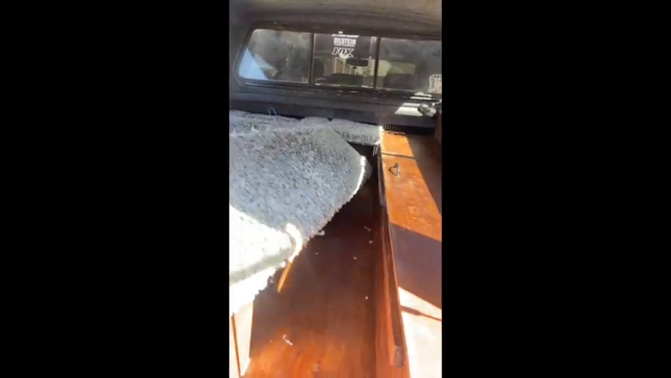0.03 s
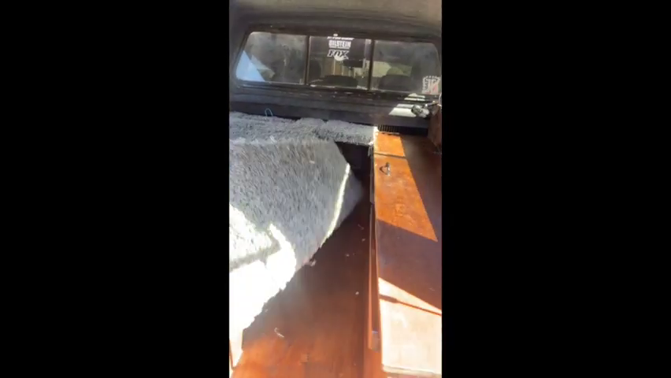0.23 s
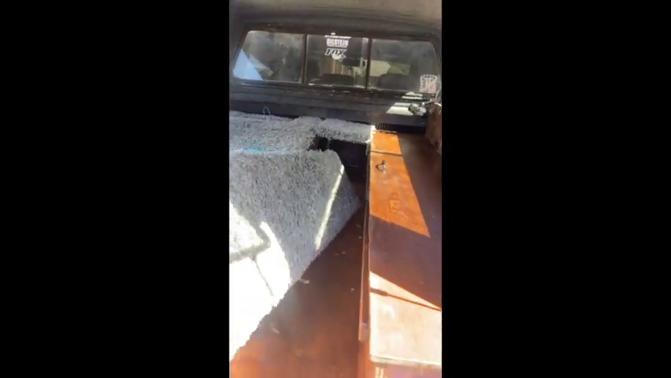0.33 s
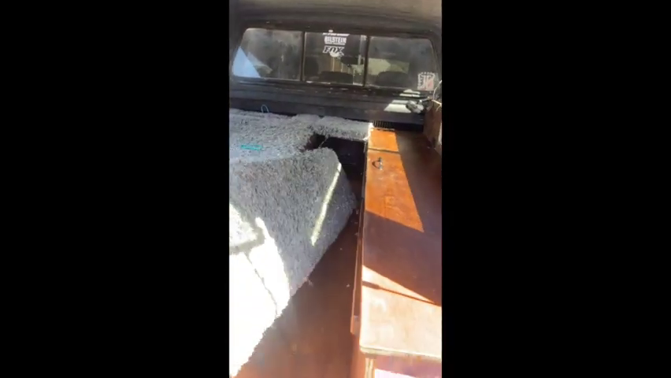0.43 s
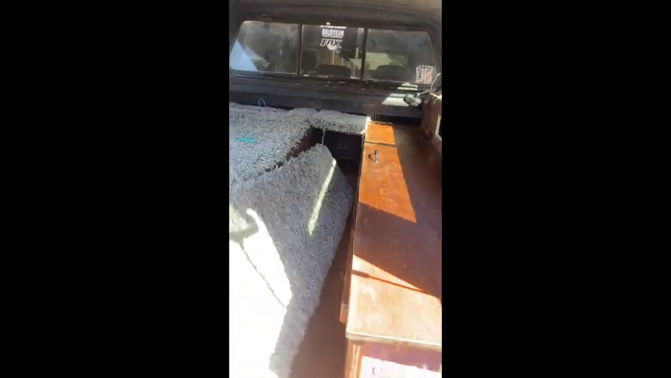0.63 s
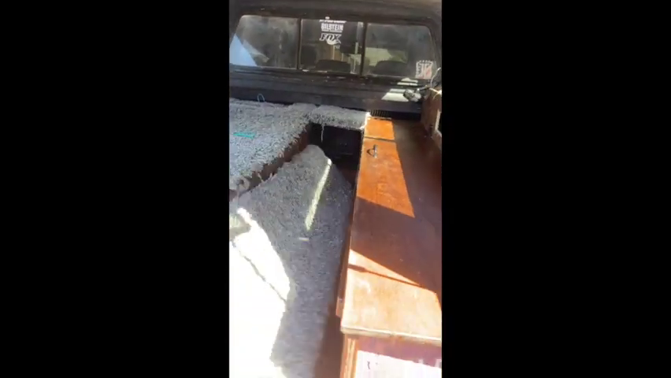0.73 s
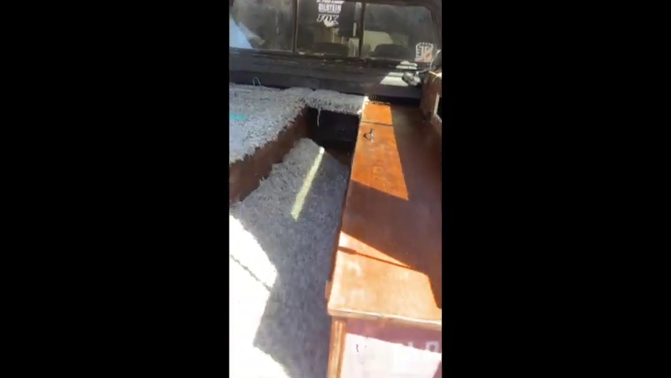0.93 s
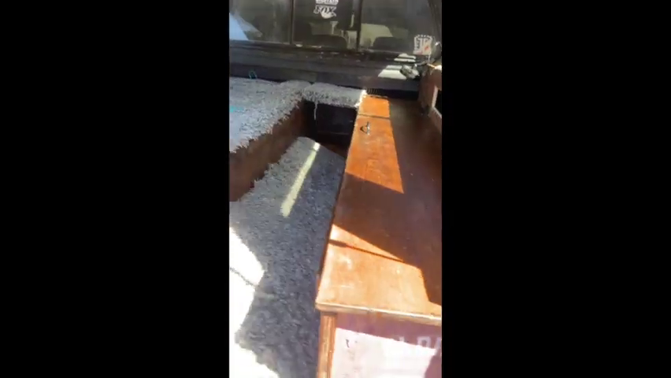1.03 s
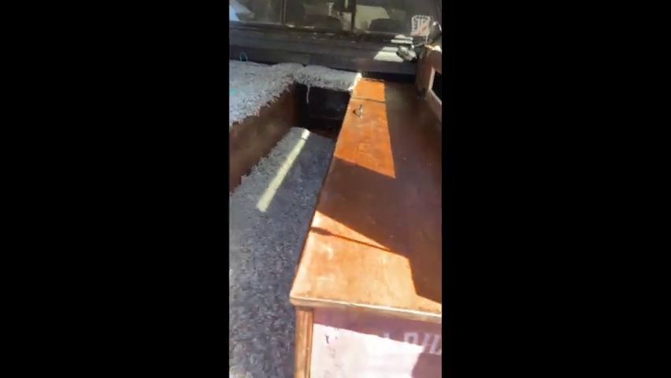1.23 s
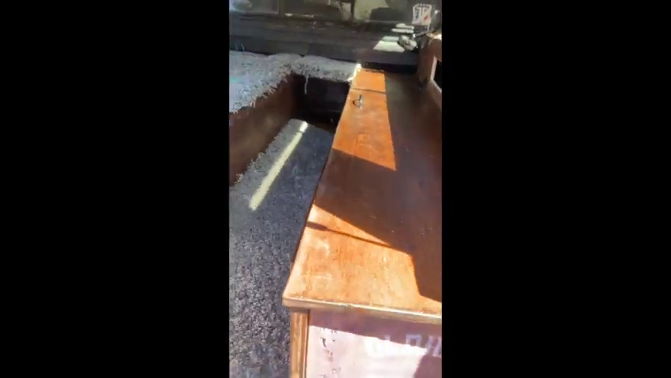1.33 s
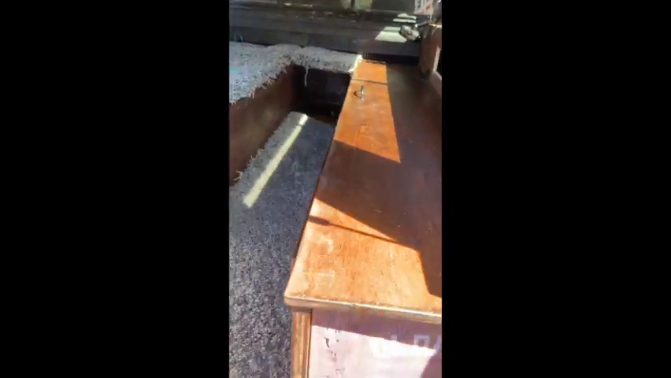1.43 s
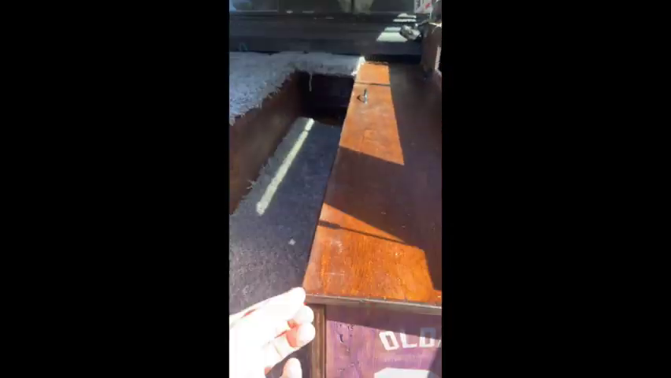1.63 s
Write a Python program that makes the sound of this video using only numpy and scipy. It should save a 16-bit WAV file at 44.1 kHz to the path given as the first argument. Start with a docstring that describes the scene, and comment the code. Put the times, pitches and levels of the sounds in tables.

```python
"""A carpeted wooden panel is lowered into its frame in a small camper: it bangs, scuffs, slides and thumps home.
Blows are cracks, clacks and thuds of noise over ringing panel modes, with the cramped cabin booming around them;
scrapes are tiny random slips through wood resonances; the wobble and carpet brushing are shaped noise.
A loose fitting pings across the cabin, and at the end something ticks right at the two-port microphone."""
import sys
import numpy as np
from scipy import signal
from scipy.fft import rfft, irfft, next_fast_len
from scipy.io import wavfile
from scipy.ndimage import uniform_filter1d, minimum_filter1d, map_coordinates

SR = 44100
rng = np.random.default_rng(int(sys.argv[2]) if len(sys.argv) > 2 else 0)


def generate_wav(signal):
    """Clip the signal to [-1, 1] and save it as 16-bit WAV at the path in sys.argv[1]."""
    frames = np.transpose(np.atleast_2d(signal))
    scaled = np.clip(frames, -1, 1) * 32767
    pcm = np.round(scaled).astype(np.int16)
    wavfile.write(sys.argv[1], SR, pcm)


N = 74970


def amp(db):
    """Decibels to gain."""
    return 10 ** (np.asarray(db) / 20)


def unit(x):
    """Scale to rms 1."""
    return x / np.sqrt(np.mean(x ** 2) + 1e-20)


def seconds():
    """The time of each sample."""
    return np.arange(N) / SR


def filtered(x, response):
    """x times a complex response of frequency, padded so that the end does not wrap round."""
    m = next_fast_len(N + SR // 2)
    return irfft(rfft(x, m) * response(np.fft.rfftfreq(m, 1 / SR)), m)[..., :N]


def coloured(x, points):
    """x through (frequency [Hz], level [dB]) points on a log frequency axis."""
    f, db = np.transpose(points)
    return filtered(x, lambda hz: amp(np.interp(np.log(hz + 1), np.log(f + 1), db)))


def noise(points):
    """Coloured noise of rms 1."""
    return unit(coloured(rng.standard_normal(N), points))


def gains(rows):
    """A gain per sample for each dB column."""
    times, *columns = np.transpose(rows)
    return [amp(np.interp(seconds(), times, db)) for db in columns]


def steady(x, span_s):
    """Even out the chance swells of x, leaving rms near 1."""
    power = uniform_filter1d(x * x, max(3, int(span_s * SR)))
    return x / np.sqrt(np.abs(power) + 1e-9)


def add(track, s, sound):
    """Mix a sound in at time s."""
    i = int(s * SR)
    track[i:i + len(sound)] += sound[:N - i]


def ring(modes, rise_s):
    """Damped sines of alternating sign that swell over rise_s, each level varying a little at random."""
    t = seconds()[:SR]
    total = np.zeros(len(t))
    for k, (hz, t60, db) in enumerate(modes):
        decay = amp(db + rng.normal(0, .7) - 60 * t / t60)
        total += (-1) ** k * decay * np.sin(2 * np.pi * hz * t)
    return total * (1 - np.exp(-t / rise_s))


def burst(tone, decay):
    """Crowded wood modes heard as noise: a quick direct part, then the cabin's short tail."""
    rise_s, direct_s, tail_db, tail_s = decay
    t = seconds()[:SR]
    direct = amp(-60 * t / direct_s)
    tail = amp(tail_db - 60 * t / tail_s)
    envelope = np.hypot(direct, tail) * (1 - np.exp(-t / rise_s))
    return steady(noise(tone), .008)[:len(t)] * envelope


# spectrum of the cabin's faint rumble: (frequency [Hz], relative level [dB])
RUMBLE_TONE = [(30, -1), (120, 0.5), (400, -12), (1500, -26), (10000, -43), (14000, -75)]
RUMBLE_DB = -56


def cabin_rumble():
    """The faint, mostly low rumble of the cabin is steady noise."""
    return amp(RUMBLE_DB) * noise(RUMBLE_TONE)


# carpet brushing: (time [s], level [dB])
BRUSH = [(0, -47), (.13, -47), (.22, -51), (.45, -53.5), (.55, -62.5), (.75, -61.5), (.9, -47.5),
         (1.2, -48), (1.33, -63), (1.4, -57), (1.44, -77), (1.7, -66)]
# its spectrum: (frequency [Hz], relative level [dB])
BRUSH_TONE = [(400, -1), (900, -6), (1800, -9.5), (3000, -17), (7000, -23), (11200, -16), (12200, -37),
              (16000, -75)]


def carpet_brush():
    """Carpet brushing is soft noise that swells and fades."""
    return gains(BRUSH)[0] * noise(BRUSH_TONE)


# small close ticks: (time [s], level before doubling [dB])
TICKS = [(1.6387, -32), (1.6432, -26), (1.6474, -28), (1.651, -32), (1.6693, -38), (1.6745, -30)]
# their spectrum: (frequency [Hz], relative level [dB])
TICK_TONE = [(2000, -26), (6000, -17), (8000, -4), (10700, 3), (13500, -21), (16000, -33)]
# rustle under the ticks: (time [s], level [dB])
RUSTLE = [(1.62, -85), (1.636, -47), (1.655, -46), (1.675, -41), (1.7, -50)]
# its spectrum: (frequency [Hz], relative level [dB])
RUSTLE_TONE = [(100, 0), (300, 6), (900, -15), (3000, -24), (11000, -15), (13000, -33), (16000, -55)]
TICK_T60_S = .003


def ticks():
    """A quick run of bright, rapidly decaying ticks over a soft rustle, right at the microphone."""
    out, t = np.zeros(N), seconds()[:SR // 50]
    for s, db in TICKS:
        envelope = 2 * amp(db - 60 * t / TICK_T60_S)
        add(out, s, envelope * steady(noise(TICK_TONE), .001)[:len(t)])
    return out + gains(RUSTLE)[0] * noise(RUSTLE_TONE)


# crack spectrum: (frequency [Hz], relative level [dB])
CRACK = [(400, -18), (1000, 5), (3800, -1), (8000, -9), (10600, -9), (12800, -32), (16000, -72)]
# crack decay: (rise [s], direct t60 [s], tail level [dB], tail t60 [s])
CRACK_DECAY = (.0002, .025, -17, .135)


def crack():
    """The sharp bright edge of a contact."""
    return burst(CRACK, CRACK_DECAY)


# modes of the loose metal fitting: (frequency [Hz], t60 [s], level [dB])
FITTING = [(1561, .09, -39), (1960, .08, -46), (4156, .06, -49)]
FITTING_S, FITTING_CLICK_DB = .426, -46
MODE_RISE_S = .002  # for the fitting and the panel


def fitting():
    """A loose metal fitting pings once, its modes set off with a click, as the panel wobbles."""
    out = np.zeros(N)
    add(out, FITTING_S, ring(FITTING, MODE_RISE_S) + amp(FITTING_CLICK_DB) * crack())
    return out


# the panel flexing: (time [s], level [dB])
WOBBLE = [(0, -49), (.22, -52), (.28, -28), (.56, -30), (.66, -39), (1.13, -37), (1.22, -46), (1.46, -40),
          (1.7, -48)]
# its spectrum: (frequency [Hz], relative level [dB])
WOBBLE_TONE = [(20, -28), (38, -8), (48, -2), (100, 0), (170, -5), (300, -24), (3000, -110)]
JUDDER_S, JUDDER_LENGTH_S, JUDDER_HZ, JUDDER_DB = 1.053, .03, 134, -16


def wobble():
    """The moving panel flexes as low noise, with a brief sine shudder where it binds."""
    t = seconds() - JUDDER_S
    swell = np.exp(-(t / JUDDER_LENGTH_S) ** 2)
    judder = amp(JUDDER_DB) * swell * np.sin(2 * np.pi * JUDDER_HZ * t)
    return gains(WOBBLE)[0] * steady(noise(WOBBLE_TONE), .05) + judder


# rasp spectrum: (frequency [Hz], relative level [dB])
RASP = [(200, -6), (900, 2.5), (1600, -2.5), (2700, 0), (4200, -11), (6800, -17), (11000, -19),
        (12300, -45), (16000, -85)]
SLIPS_PER_S, SLIP_SPREAD_DB = 13000, 3
GRIP_PER_S, GRIP_DB = 70, 2  # the grip comes and goes in random surges


def scrape(stroke, body):
    """Tiny slips rasp directly and make the wood groan at its resonances."""
    slips = (rng.random(N) < SLIPS_PER_S / SR) * rng.standard_normal(N)
    slips = slips * amp(SLIP_SPREAD_DB * rng.standard_normal(N))

    def wood(f):
        return sum((-1) ** k * amp(db) * 1j * f * width / (centre ** 2 - f * f + 1j * f * width)
                   for k, (centre, width, db) in enumerate(body))

    groan_gain, rasp_gain = gains(stroke)
    dull = coloured(filtered(slips, wood), [(600, -2), (9000, -50)])
    surges = map_coordinates(rng.standard_normal(N), [seconds() * GRIP_PER_S], mode="mirror")
    groan = groan_gain * steady(dull, .03)
    rasp = rasp_gain * steady(coloured(slips, RASP), .025)
    return amp(GRIP_DB * surges) * (groan + rasp)


# brief scuff on the frame: (time [s], groan level [dB], rasp level [dB])
SCUFF = [(.57, -80, -75), (.578, -32, -35), (.594, -22, -37), (.606, -18, -29), (.624, -16, -34),
         (.648, -24, -54), (.662, -34, -58), (.76, -70, -90)]
# wood resonances of the scuff: (frequency [Hz], width [Hz], level [dB])
SCUFF_BODY = [(325, 55, 2.5), (405, 35, -9), (570, 50, -19), (690, 110, -15)]


def scuff():
    """An edge scuffs the frame: a brief scrape."""
    return scrape(SCUFF, SCUFF_BODY)


# long slide into place: (time [s], groan level [dB], rasp level [dB])
SLIDE = [(.6, -90, -100), (.78, -35, -53), (.858, -36, -54), (.9, -25.5, -40), (.95, -26, -42),
         (1.01, -26, -36), (1.11, -23, -36), (1.145, -33, -54), (1.19, -43, -64), (1.28, -33, -53),
         (1.37, -41, -58), (1.45, -75, -100)]
# wood resonances of the slide: (frequency [Hz], width [Hz], level [dB])
SLIDE_BODY = [(140, 35, -1), (275, 40, -6), (354, 30, -1), (390, 30, -7), (470, 45, -13), (610, 80, -15),
              (835, 25, -12)]


def slide():
    """The panel slides along the wood: a long scrape."""
    return scrape(SLIDE, SLIDE_BODY)


# cabin air modes: (frequency [Hz], t60 [s], level [dB])
CABIN = [(52, .85, -9), (64, .45, -3.5), (90, .45, -3)]


def cabin_boom():
    """The air of the cramped cabin rings in a few low modes that swell slowly."""
    return ring(CABIN, .01)


# clack spectrum: (frequency [Hz], relative level [dB])
CLACK = [(100, -14), (400, -4), (600, 0), (900, -8), (1500, 0), (2100, -11), (3100, -11), (4800, -28),
         (12000, -62)]
# clack decay: (rise [s], direct t60 [s], tail level [dB], tail t60 [s])
CLACK_DECAY = (.0005, .028, -14, .155)


def clack(bright_hz):
    """The woody knock of a contact, duller when the contact is softer."""
    contact = signal.butter(2, min(bright_hz, SR / 4), fs=SR, output="sos")
    return signal.sosfilt(contact, burst(CLACK, CLACK_DECAY))


# names of the places struck, in the order of the level columns below
PLACES = ("edge", "face", "foot")
# panel modes: (frequency [Hz], t60 [s], level struck at the edge [dB], on the face [dB], at the foot [dB])
PANEL = [(108, .38, -7, -20, -18), (133, .3, -15, -26, -17), (169, .17, -3.5, -16, -24),
         (239, .22, -13, -13, -32), (321, .15, -12, -24, -17), (352, .15, -19, -12, -28),
         (366, .14, -4, -27, -20), (397, .15, -12, -23.5, -20), (456, .13, -13, -28, -26),
         (516, .15, -14, -12, -35), (580, .06, -16, -6, -28), (690, .08, -18, -23.5, -19),
         (1480, .036, -34, -9, -19)]
# thud spectrum: (frequency [Hz], relative level [dB])
THUD = [(70, -11), (130, -2), (200, 0), (450, -11), (800, -29), (4000, -100)]
# thud decay: (rise [s], direct t60 [s], tail level [dB], tail t60 [s])
THUD_DECAY = (.003, .1, -9, .26)
# thud under the ring: (level struck at the edge [dB], on the face [dB], at the foot [dB])
THUD_DB = (-8, -12, -12)


def panel_body(place, bright_hz):
    """The place struck sets how strongly each panel mode rings; a soft contact excites the high ones less."""
    where = PLACES.index(place)
    modes = []
    for hz, t60, *levels in PANEL:
        softness_db = 10 * np.log10(1 + (hz / bright_hz) ** 4)
        modes.append((hz, t60, levels[where] - softness_db))
    return ring(modes, MODE_RISE_S) + amp(THUD_DB[where]) * burst(THUD, THUD_DECAY)


# blows: (time [s], place struck, panel level [dB], cabin boom level [dB], clack level [dB],
#         crack level [dB], brightness of the contact [Hz])
KNOCKS = [(.232, "edge", -1, -10, -12, -12, 3000), (.2375, "edge", -5, -30, -5, -14, 3000),
          (.267, "face", -13, -30, -24, -34, 900), (.3255, "edge", -20, -20, -26, -30, 3200),
          (.388, "foot", -21, -23, -60, -70, 600), (.490, "face", -35, -30, -39, -75, 700),
          (.722, "face", 2, -31, -5.5, -21, 3600), (.752, "face", -11, -36, -25, -35, 1800),
          (.867, "edge", -15, -34, -40, -50, 1800), (1.3535, "foot", -1.5, -28, -16, -47, 1900),
          (1.384, "foot", -8, -30, -34, -48, 200)]
BEND_DELAY_S = .001  # the bass arrives after the crack
CHATTER_S, CHATTER_LOSS_DB = .006, 7  # longest gap between rebounds, loss at each


def knocks():
    """Each blow cracks and clacks, rebounds weaker three times, sounds the panel and booms in the cabin."""
    out = np.zeros(N)
    for s, place, panel_db, boom_db, clack_db, crack_db, bright_hz in KNOCKS:
        add(out, s, amp(crack_db) * crack() + amp(clack_db) * clack(bright_hz))
        rebounds_s = np.cumsum(CHATTER_S * rng.uniform(.5, 1, size=3))
        for k, lag_s in enumerate(rebounds_s, 1):
            add(out, s + lag_s, amp(crack_db - k * CHATTER_LOSS_DB) * crack())
        body = amp(panel_db) * panel_body(place, bright_hz)
        add(out, s + BEND_DELAY_S, body + amp(boom_db) * cabin_boom())
    return out


# phase between the microphone ports: (frequency [Hz], lead of the left [rad])
PORT_PHASE = [(1500, 0), (3000, 1), (4650, 1.4), (5050, 5), (6000, 6.2), (9000, 9.4), (12400, 12.5)]
RIGHT_DB, DIFFUSE_DB = .6, -21  # right over left; wall reflections before their colouring


def stereo(x):
    """The two ports differ in phase, more so in the treble; faint wall reflections differ between them."""
    t = seconds()[:SR // 8]
    walls = rng.standard_normal(len(t)) * amp(-60 * t / .12)
    reflected = signal.fftconvolve(x, walls / np.linalg.norm(walls))[:N]
    side = amp(DIFFUSE_DB) * coloured(reflected, [(60, -18), (500, 2)])
    sign = np.array([[1], [-1]])  # left, right

    def ports(hz):
        return np.exp(.5j * sign * np.interp(hz, *np.transpose(PORT_PHASE)))

    return filtered(x, ports) * amp(-sign * RIGHT_DB / 2) + sign * side


# microphone colour: (frequency [Hz], level [dB])
MIC = [(20, -10), (45, 1), (8000, 0)]


def scene():
    """Panel, carpet and ticks reach the microphone ports over the faint rumble of the cabin."""
    panel = knocks() + fitting() + wobble() + scuff() + slide()
    heard = coloured(panel + carpet_brush() + ticks(), MIC)
    return stereo(heard) + cabin_rumble()


CEILING, LIMIT_HOLD_S, TOP_HZ = .88, .002, 16500


def record(dry):
    """A fast limiter holds the bangs down; nothing passes above the band limit."""
    width = max(4, int(LIMIT_HOLD_S * SR))
    needed = np.minimum(1, CEILING / (np.abs(dry).max(axis=0) + 1e-9))
    gain = uniform_filter1d(minimum_filter1d(needed, width), width)
    return filtered(dry * gain, lambda hz: hz < TOP_HZ)


dry = scene()
out = record(dry)
generate_wav(out)
```